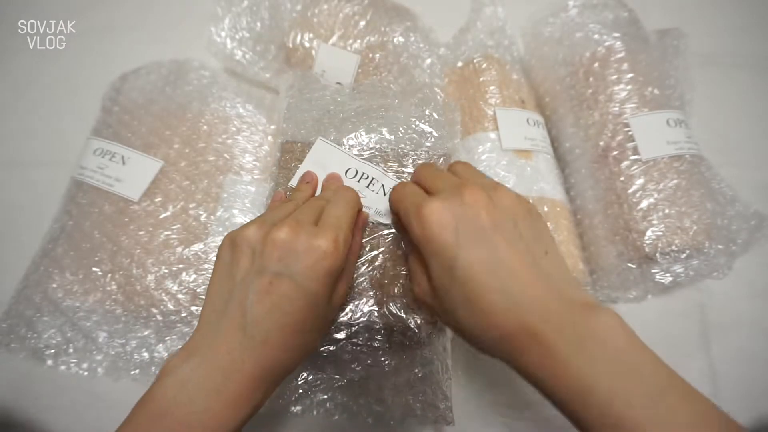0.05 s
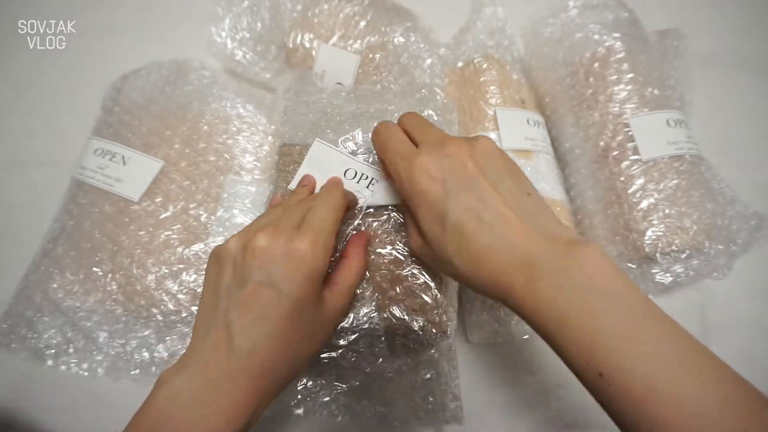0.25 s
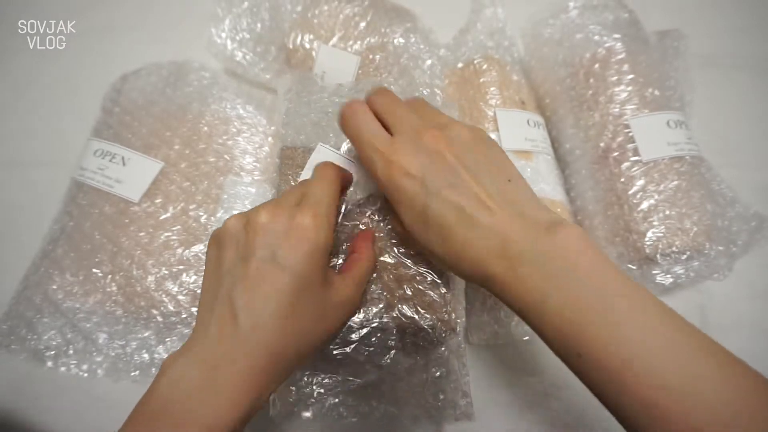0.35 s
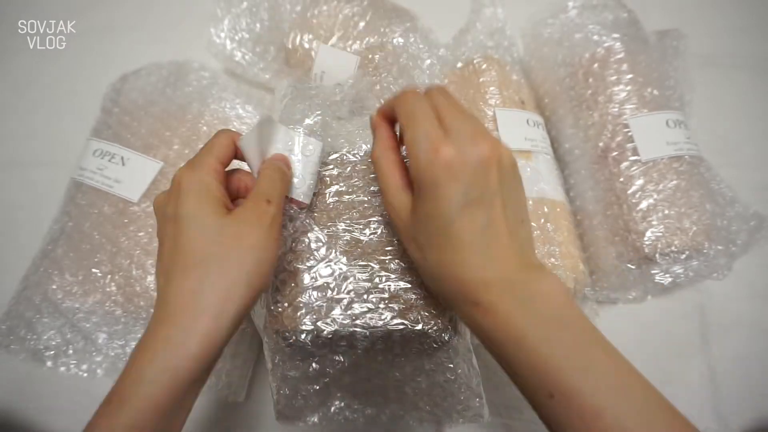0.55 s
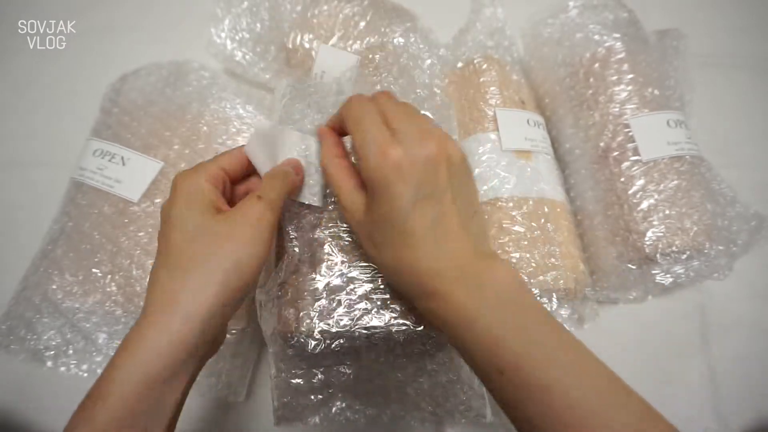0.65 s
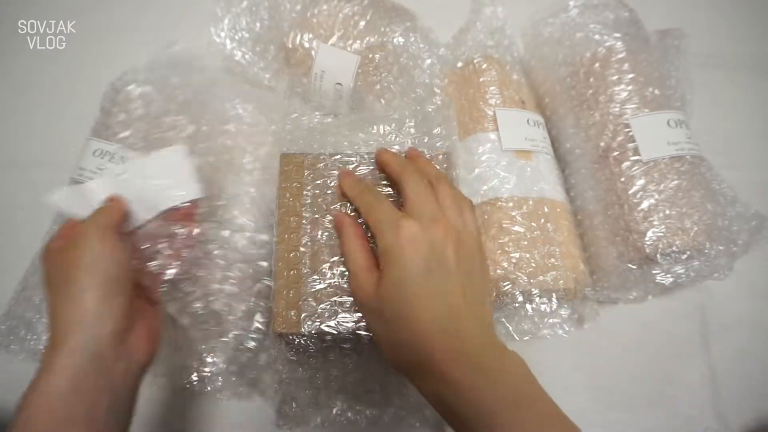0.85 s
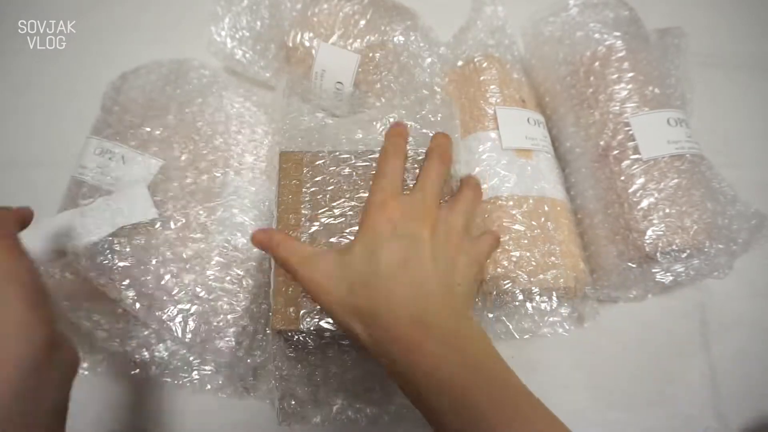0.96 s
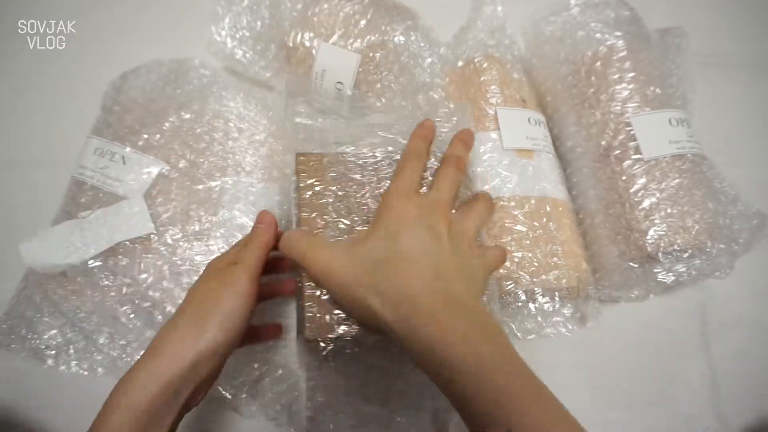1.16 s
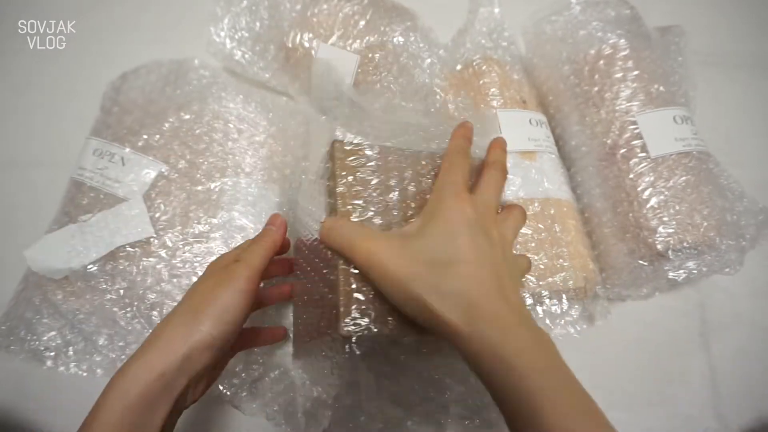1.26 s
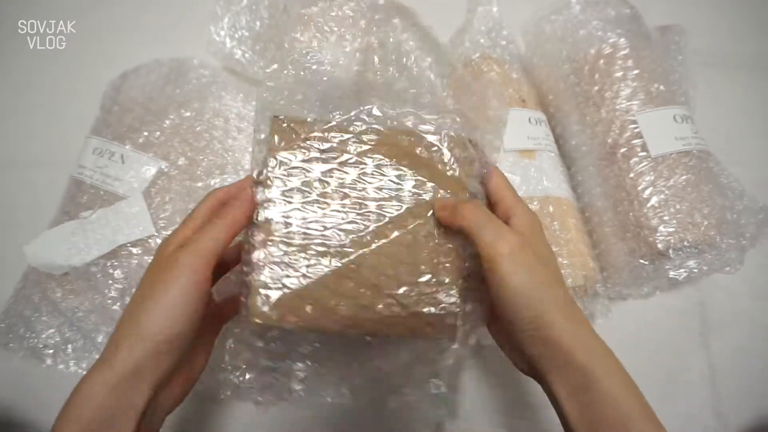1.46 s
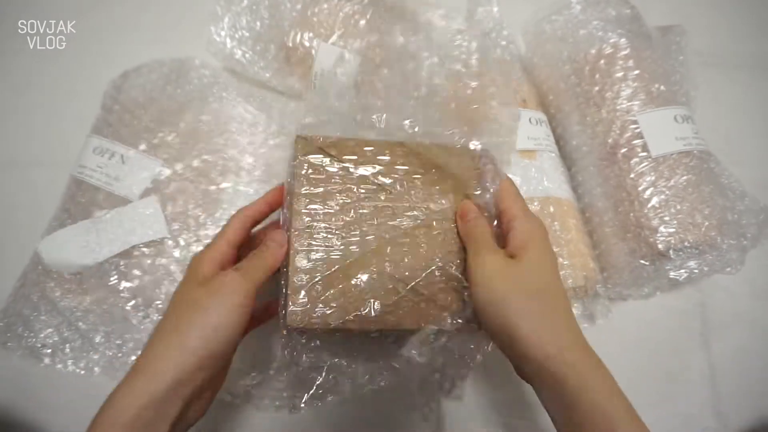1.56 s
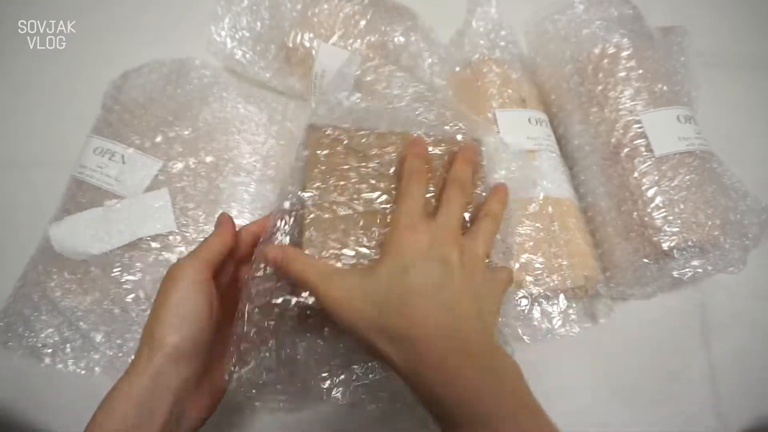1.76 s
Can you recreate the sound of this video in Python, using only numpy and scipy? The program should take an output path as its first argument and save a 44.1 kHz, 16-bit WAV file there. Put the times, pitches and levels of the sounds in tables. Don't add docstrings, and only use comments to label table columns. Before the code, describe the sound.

A sticky label peels off bubble wrap with sharp snaps and a quick rip, then crackling plastic

```python
import sys
import numpy as np
from scipy import signal
from scipy.io import wavfile
from scipy.ndimage import uniform_filter1d

SR = 44100
rng = np.random.default_rng(int(sys.argv[2]) if len(sys.argv) > 2 else 0)


def decibels_to_gain(level_db):
    exponent = np.asarray(level_db, float) / 20
    return 10 ** exponent


def materialize(psi):
    bounded = np.clip(np.atleast_2d(psi).T, -1, 1)
    quanta = np.round(bounded * 32767).astype(np.int16)
    wavfile.write(sys.argv[1], SR, quanta)


N = 79380

# [f/Hz, level/dB]
FILM_COLOUR = [(300, -41), (900, -7.5), (1700, -7.5), (2700, -4), (4400, -5), (7000, -1.5), (11000, -5),
               (15500, -7)]
# [f/Hz, level/dB]
GLUE_COLOUR = [(300, -99.5), (1000, -15), (2500, -7.5), (3400, -7.5), (7300, 2), (11000, -2.5), (15500, -6)]
# [f/Hz, share 0-1]
STEREO_LIKENESS = [(300, 0.96), (1400, 0.76), (4000, 0.42), (15000, 0.039)]


def evened(x):
    return x / np.sqrt(np.mean(x ** 2) + 1e-20)


def read(points, hz):
    f, value = np.transpose(points)
    return np.interp(np.log(hz + 1), np.log(f + 1), value)


def colour(x, points):
    hz = abs(np.fft.fftfreq(2048, 1 / SR))
    low_fall = np.clip(hz / points[0][0], 0.01, 1) ** 2
    log_gain = np.log(decibels_to_gain(read(points, hz)) * low_fall)
    taps = np.fft.ifft(np.exp(np.conj(signal.hilbert(log_gain)))).real[:1024]
    return signal.oaconvolve(x, taps[None] / np.linalg.norm(taps), axes=1)[:, :N]


def resonate(x, hz, width_hz):
    b, a = signal.iirpeak(hz, hz / width_hz, SR)
    return signal.lfilter(b, a, signal.lfilter(b, a, x))


def clicks(per_s, spread_db):
    size = decibels_to_gain(spread_db * np.minimum(rng.exponential(1, N), 3.8))
    size = size * (rng.random(N) < per_s / SR) * rng.choice([-1, 1], N)
    side = rng.uniform(-0.45, 0.55, N)
    return np.array([size * (1 + side), size * (1 - side)])


def hiss(frames, size, same):
    a, b, c, d = rng.standard_normal((frames, size, 4)).T
    same = np.clip(same, -1, 1)[:, None]
    left, other = a + 1j * b, c + 1j * d
    return np.array([left, same * left + np.sqrt(1 - same ** 2) * other])


def air():
    # [f/Hz, level/dB]
    air_colour = [(18, -52), (130, -28), (659, -6.5), (979, -21), (1800, -0.5), (2970, 3.5), (3970, -11.5),
                  (15200, -1), (16500, -13.5)]
    hz = np.fft.rfftfreq(1024, 1 / SR)
    z = hiss(N // 256 + 5, 513, read(STEREO_LIKENESS, hz)) * decibels_to_gain(read(air_colour, hz))[:, None]
    tone = signal.istft(z, nperseg=1024, noverlap=768)[1][:, :N]
    return decibels_to_gain(-66.5) * evened(tone)


def bumps():
    # [t/s, level/dB, f/Hz]
    knocks = [
        (0.226, -61.5, 202),
        (.28, -75, 180),
        (.372, -68.5, 250),
        (.595, -84, 91),
        (1.292, -84, 90),
        (1.546, -58, 480),
        (1.6, -93, 90),
        (1.42, -86, 80),
    ]
    out, t = np.zeros(N + 3000), np.arange(3000) / SR
    for s, db, hz in knocks:
        onset = np.minimum(t * 1000, 1)
        knock = np.cos(2 * np.pi * hz * t) * np.exp(-t * hz / 0.85) * onset
        out[round(s * SR):][:3000] += decibels_to_gain(db) * knock
    return out[:N]


def rustle():
    # [t/s, rustle level/dB, pressure on the pockets/dB]
    hand_motion = [(0, -53, -2), (.13, -54.5, -5.5), (0.341, -59.5, -11.5), (0.408, -40, -9),
                   (.47, -56, -7), (.6, -59.5, -13), (0.688, -64.5, -13.5), (0.779, -54, -33),
                   (0.901, -59, -20.5), (0.979, -53.5, -11.5), (1.089, -65, -8.5), (1.199, -54, -11.5),
                   (1.381, -56, -32), (1.45, -44.5, -20.5), (1.538, -44, -9.5), (1.64, -47, -14.5),
                   (1.719, -51.5, -17.5), (1.778, -45, -16.5)]
    # [t/s, level above the rustle/dB]
    flurries = [
        (.14, 1.5),
        (0.504, 4),
        (0.786, -5.5),
        (0.832, 3.5),
        (.897, 6.5),
        (1.303, 2),
    ]
    s, level_db, press_db = np.transpose(hand_motion)
    t = np.arange(N) / SR

    def bell(at_s, width_s):
        return np.exp(-((t - at_s) / width_s) ** 2 / 2)

    film = evened(colour(clicks(per_s=4300, spread_db=2.5), FILM_COLOUR))
    film = film * decibels_to_gain(sum(db * bell(at_s, 0.011) for at_s, db in flurries))

    taps = clicks(per_s=1600, spread_db=2.1)
    pockets = evened(resonate(taps, hz=1029, width_hz=565))
    box = evened(resonate(taps, hz=424, width_hz=114))
    dull = pockets + decibels_to_gain(-2.5) * box
    hands = decibels_to_gain(np.interp(t, s, level_db)) * (film + decibels_to_gain(np.interp(t, s, press_db)) * dull)

    squeak = evened(resonate(clicks(per_s=840, spread_db=3.2), hz=2800, width_hz=420))
    return hands + decibels_to_gain(-49) * bell(at_s=1.532, width_s=0.017) * squeak


def pops():
    # [t/s, peak level/dB, f/Hz]
    pocket_pops = [(0.003, -39.5, 1000), (0.012, -42, 920), (.025, -45.5, 940), (.054, -47.5, 970),
                   (0.066, -45.5, 910), (0.1064, -43.5, 920), (0.2255, -49, 1100), (0.2351, -42.5, 926),
                   (0.2404, -39.5, 1050), (0.2805, -41, 1410), (0.2868, -47.5, 1030), (0.358, -42.5, 1140),
                   (0.398, -59, 1160), (0.4114, -38, 1000), (0.4276, -35, 1033), (0.4616, -45, 963),
                   (0.475, -45.5, 1180), (0.5986, -49.5, 1170), (0.9257, -57.5, 1350), (0.9595, -49, 980),
                   (1.1194, -52, 1190), (1.2666, -48.5, 1250), (1.2967, -39.5, 1195), (1.3121, -41, 1230),
                   (1.3497, -35.5, 1170), (1.425, -38, 1350), (1.537, -36, 1090), (1.5473, -33.5, 820),
                   (1.5902, -37, 1010), (1.7495, -48.5, 756), (1.755, -47, 940),
                   (0.0172, -50, 1020), (0.0592, -49, 1005), (0.1629, -55, 990), (0.275, -52, 1050),
                 (0.3307, -58, 1080), (0.3974, -45, 1130), (0.446, -57, 1130), (0.4946, -43.5, 1240),
                 (0.604, -56, 1020), (0.9415, -57, 1160), (1.2415, -55, 1200), (1.2922, -48, 1120),
                 (1.3274, -47, 1190), (1.464, -50, 1050), (1.6734, -51.5, 1210), (1.678, -50, 1340)]
    rise_cycles, boost_db = 0.93, 2
    out, t = np.zeros(N + 700), np.arange(600) / SR
    for s, db, hz in pocket_pops:
        u = t * hz / rise_cycles
        swell = np.e * u * np.exp(-u)
        out[round(s * SR) - 60:][:600] += decibels_to_gain(db + boost_db) * swell * np.sin(2 * np.pi * hz * t)
    return out[:N]


def snaps(rows, boost_db, ring_db, tone):
    burst_s, width, needle = 0.00032, 0.28, -2.27
    ring_cycles, ring_max_s, ring_send = 2.8, 0.0008, 0.35
    out, t = np.zeros((2, 2, N + 300)), np.arange(200) / SR
    noise = rng.standard_normal((len(rows), 2, 200))
    for (s, db, hz), (mid, side) in zip(rows, noise):
        mid = mid + needle * (t == 0)
        side = np.diff(side, prepend=0)
        burst = np.array([mid + width * side, mid - width * side]) * np.exp(-t / burst_s)
        crack = colour(burst, tone)[:, :200]
        b, a = signal.butter(3, max(0.4 * hz, 1480), "high", fs=SR)
        crack = evened(signal.lfilter(b, a, crack))
        ring = np.sin(2 * np.pi * hz * t) * np.exp(-t / min(ring_cycles / hz, ring_max_s))
        ring = decibels_to_gain(ring_db) * evened(ring)
        peak = np.sqrt(2 * uniform_filter1d((crack + ring).mean(0) ** 2, size=16).max())
        both = np.array([crack + ring, crack + ring_send * ring])
        start = round(s * SR)
        out[..., start:start + 200] += decibels_to_gain(db + boost_db) * both / peak
    return out[..., :N]


def ticks():
    # [t/s, peak level/dB, ring
    # f/Hz]
    fine_ticks = [(0.0255, -41, 5000), (0.042, -44, 7900), (0.064, -42, 5500), (0.0873, -43, 5400),
                  (0.0982, -46, 10700), (0.1118, -43, 6700), (0.1135, -42, 6900), (0.1279, -41, 8200),
                  (0.1421, -41, 8100), (0.1621, -42, 8000), (0.2071, -42, 11600), (0.2332, -16, 10700),
                  (0.2828, -28, 9800), (0.321, -29, 13900), (0.3292, -26, 8300), (0.3314, -38, 8900),
                  (0.4922, -43, 5700), (0.5204, -41, 7500), (0.5513, -45, 9300), (0.5989, -37, 12400),
                  (0.6424, -49, 2800), (0.6472, -49, 2700), (0.7047, -56, 7900), (0.782, -36, 7400),
                  (0.7845, -43, 7800), (0.7863, -41, 7500), (0.7901, -42, 7600), (0.8066, -44, 3200),
                  (0.8343, -41, 6400), (0.8542, -47, 5500), (0.8955, -44, 7400), (0.9549, -39, 2800),
                  (0.9843, -44, 10400), (1.0556, -54, 6200), (1.1105, -48, 7500), (1.12, -47, 1800),
                  (1.1465, -52, 3400), (1.2651, -43, 3500), (1.2913, -40, 3500), (1.3102, -39, 6200),
                  (1.3151, -41, 5700), (1.3266, -41, 6600), (1.3827, -45, 6500), (1.4222, -39, 2800)]
    return snaps(fine_ticks, boost_db=3, ring_db=1, tone=GLUE_COLOUR)


def creases():
    # [t/s, peak level/dB, ring f/Hz]
    film_creases = [(0.0111, -36, 7200), (0.0162, -39.5, 7500), (0.0708, -37, 7600), (0.0755, -38, 10900),
                    (0.1048, -39, 6100), (0.1325, -30, 10800), (0.1392, -31, 7850), (0.1639, -33.5, 8040),
                    (0.1789, -35, 6200), (0.4725, -34, 2000), (0.5128, -41, 2600), (0.5184, -38.5, 8000),
                    (0.5797, -30, 10600), (0.5904, -34, 7000), (0.597, -30.5, 2900), (0.6646, -33, 14500),
                    (0.7268, -35.5, 10600), (0.7789, -35, 6600),
                    (0.924, -29, 2800), (0.9239, -31, 12000), (0.9569, -29, 2800), (0.961, -37, 10500),
                  (1.1175, -35.5, 5700), (1.1808, -36, 3680), (1.2402, -37, 2960), (1.267, -41, 5900),
                  (1.2958, -29, 4000), (1.3508, -28, 3800), (1.3984, -32.5, 6200), (1.4234, -36, 2400),
                  (1.441, -27.5, 8000), (1.5174, -31, 7460), (1.5686, -38, 5600), (1.626, -32, 2600),
                  (1.6772, -33.5, 13300), (1.7083, -36, 2800), (1.771, -33, 10800)]
    # [t/s, peak level/dB, ring f/Hz]
    clusters = [
        (0.234, -17.5, 5470),
        (.3563, -32, 12700),
        (0.383, -23.5, 6850),
        (1.2938, -33, 3700),
        (0.875, -40, 12200),
        (0.9584, -33, 5400),
    ]
    return snaps(film_creases + clusters, boost_db=5, ring_db=-2.5, tone=FILM_COLOUR)


def peel():
    # [t/s, peak level/dB, ring f/Hz]
    tugs = [(0.2263, -24, 4530), (0.2333, -11.5, 11000), (0.235, -17.5, 3290), (0.2377, -15, 6600),
            (0.2416, -20, 6840), (0.2809, -18, 3550), (0.2829, -47, 9700), (0.2851, -15, 11000),
            (0.3067, -22.5, 8900), (0.3117, -22.5, 8600), (0.3211, -44, 14100), (0.3293, -37, 8600),
            (0.3525, -12, 8650), (0.3545, -19.5, 6700), (0.3572, -11.5, 10400), (0.3593, -23.5, 8200)]
    # [t/s, peak level/dB, ring f/Hz]
    rip = [(0.3791, -11, 8500), (0.3826, -18, 13000), (0.385, -16, 8300), (0.3891, -19, 7800),
           (0.3966, -15, 3400), (0.399, -21, 6900), (0.4011, -18, 8900), (0.4028, -19, 5700),
           (0.4055, -18, 8600), (0.4074, -14, 7200), (0.4102, -14, 7200), (0.4122, -13, 10700),
           (0.4138, -21, 3300), (0.4154, -17, 7700), (0.4178, -17, 10500), (0.4202, -15, 7500),
           (0.4246, -17, 7500), (0.4268, -19, 7400), (0.4287, -22, 3300), (0.4303, -18, 10700)]
    return snaps(tugs + rip, boost_db=2.5, ring_db=-2.0, tone=GLUE_COLOUR)


def room(x):
    # [f/Hz, T60/s]
    decay = [(1000, 0.11), (5000, 0.1), (15000, 0.087)]
    # [f/Hz, level/dB]
    tail_colour = [(400, -11.5), (1000, -4.5), (3000, 9.5), (8000, 3.5), (15000, 6.5)]
    far_db, far_t60_s, turn_hz = -26.5, 0.34, 15
    hz, t = np.fft.rfftfreq(64, 1 / SR), np.arange(800) * 16 / SR
    near = decibels_to_gain(-60 * t / read(decay, hz)[:, None])
    fade = near + decibels_to_gain(far_db - 60 * t / far_t60_s)
    out, turn = np.zeros((2, N)), np.arange(N) / SR * turn_hz
    for k in range(3):
        z = hiss(800, 33, read(STEREO_LIKENESS, hz)) * fade * decibels_to_gain(read(tail_colour, hz))[:, None]
        tail = signal.istft(z, nperseg=64, noverlap=48)[1]
        tail = tail * np.clip(np.arange(tail.shape[1]) / SR / 0.0016, 0, 1)
        tail = tail / np.linalg.norm(tail[0])
        share = np.sqrt(2 / 3) * np.cos(2 * np.pi * (turn + k / 3))
        out += signal.fftconvolve((x.mean(0) * share)[None], tail, axes=1)[:, :N]
    return out


def scene():
    thin = signal.butter(5, 675, "high", fs=SR, output="sos")
    glue = peel() + rustle()
    film = creases() + ticks() + pops()
    direct = signal.sosfilt(thin, glue[0] + film[0])
    sent = signal.sosfilt(thin, glue[1] + decibels_to_gain(-0.5) * film[1])
    return direct + decibels_to_gain(1.5) * room(sent) + air() + bumps()


def top_cut(x):
    return signal.sosfilt(signal.butter(12, 16820, fs=SR, output="sos"), x)


def record(dry):
    # [t/s, left minus right/dB]
    hand_side = [
        (0.0, -3),
        (0.882, -1.5),
        (0.922, 2.5),
        (1.012, -3.5),
        (1.082, -1),
        (1.108, -7.5),
        (1.158, -3),
        (1.8, -2.5),
    ]
    high = signal.lfilter(*signal.butter(1, [2050, 11000], "band", fs=SR), dry)
    lean_db = 1.3 * np.interp(np.arange(N) / SR, *np.transpose(hand_side))
    x = dry + high * (decibels_to_gain(np.array([lean_db / 2, -lean_db / 2])) - 1)
    band_limit = signal.firwin(511, 15850, window=("kaiser", 7), fs=SR)
    x = signal.oaconvolve(x, band_limit[None], "same")
    return top_cut(x)


dry = scene()
out = record(dry)
materialize(out)
```